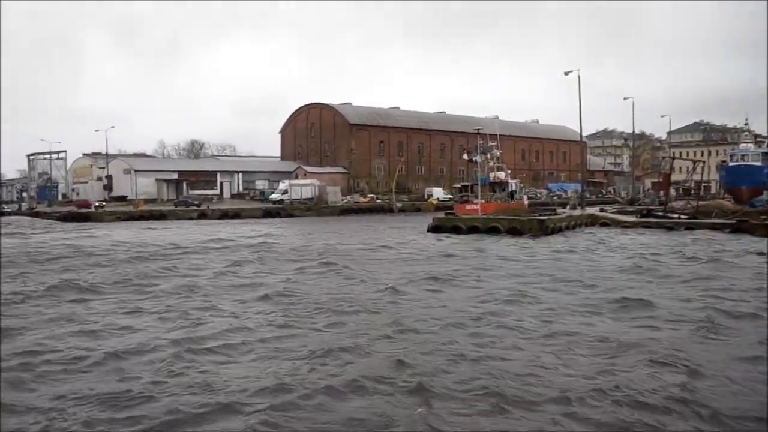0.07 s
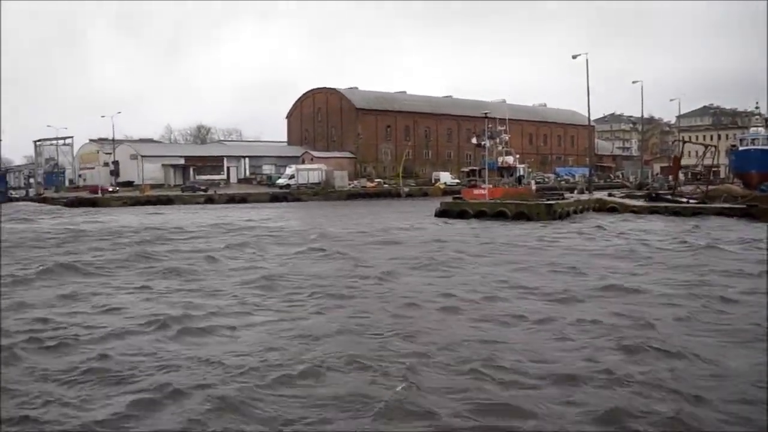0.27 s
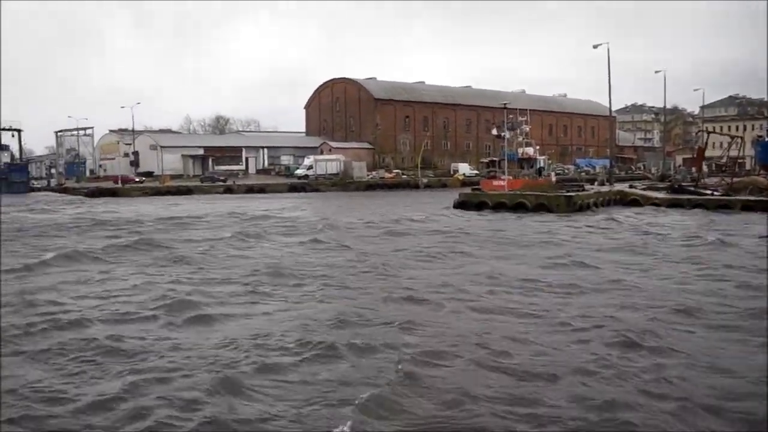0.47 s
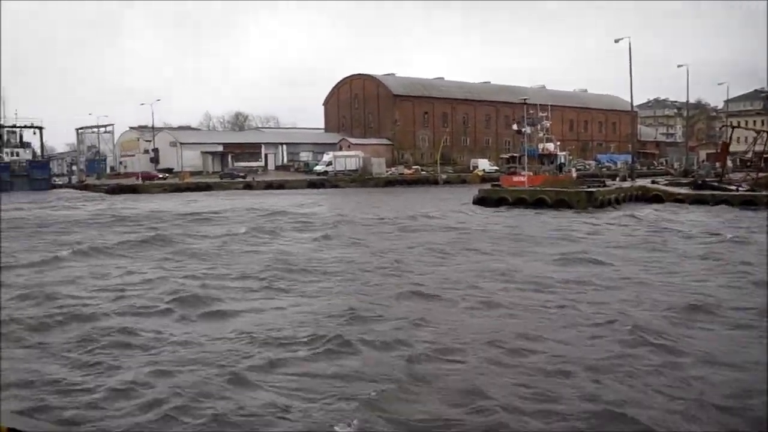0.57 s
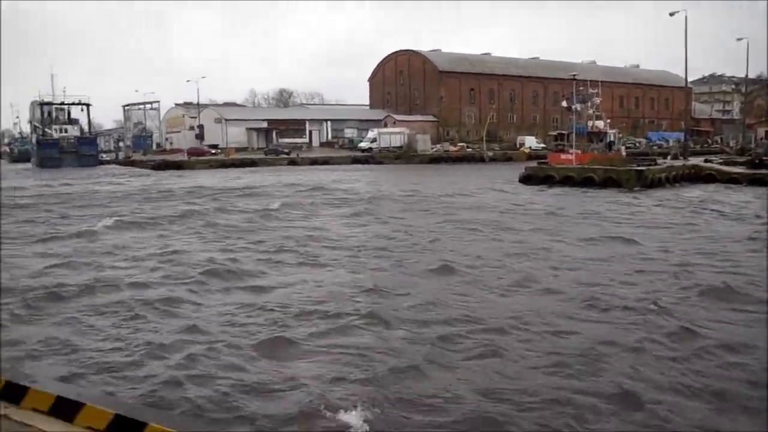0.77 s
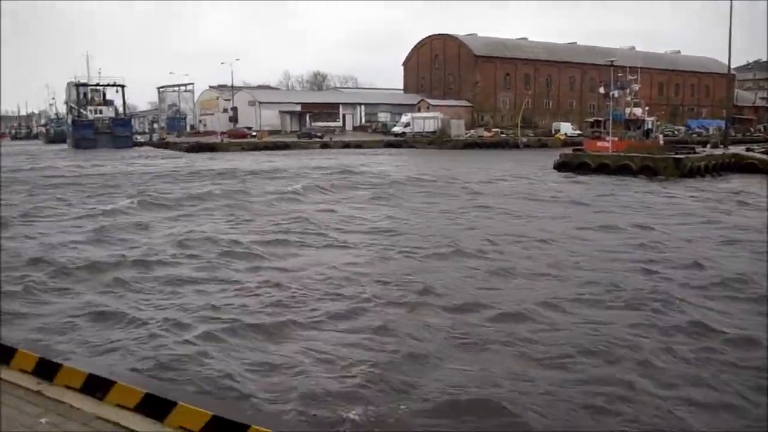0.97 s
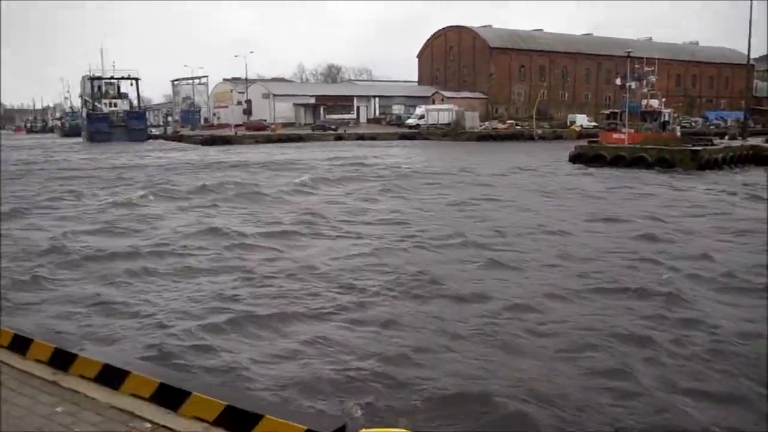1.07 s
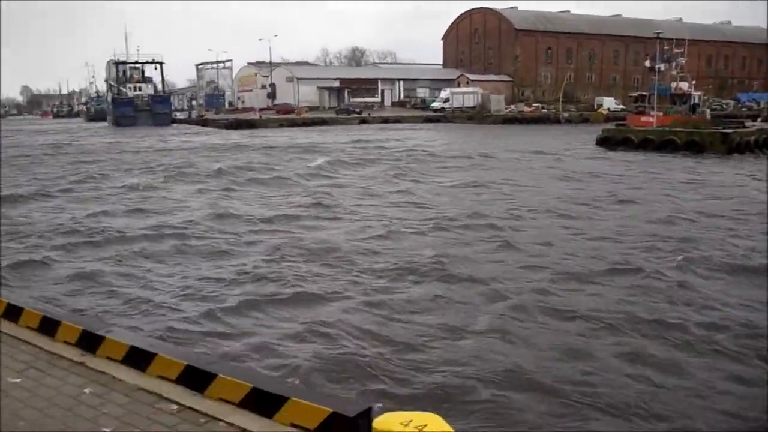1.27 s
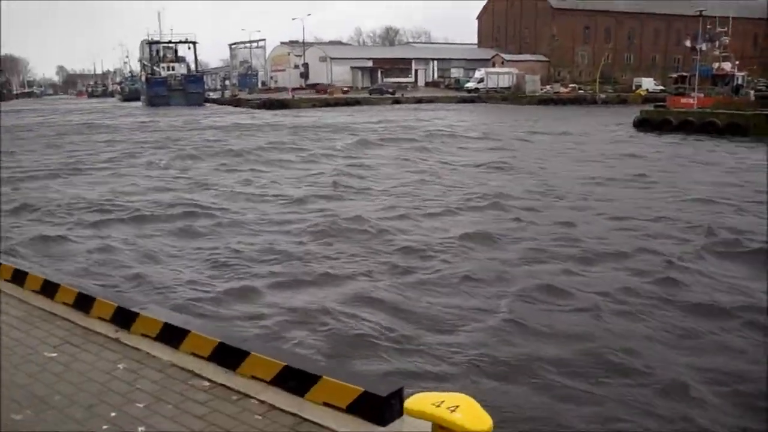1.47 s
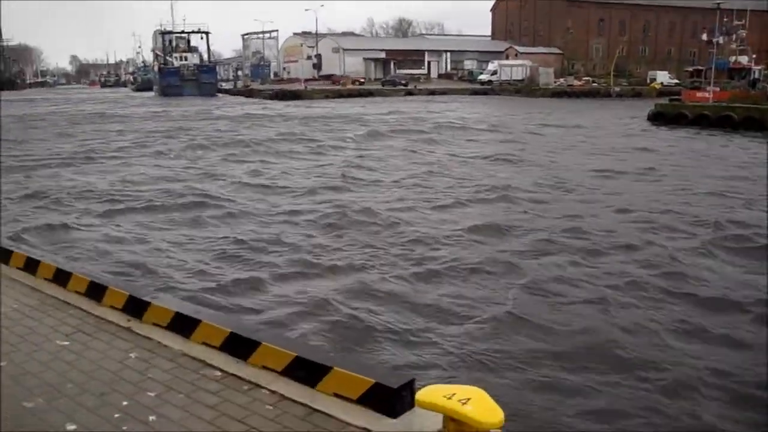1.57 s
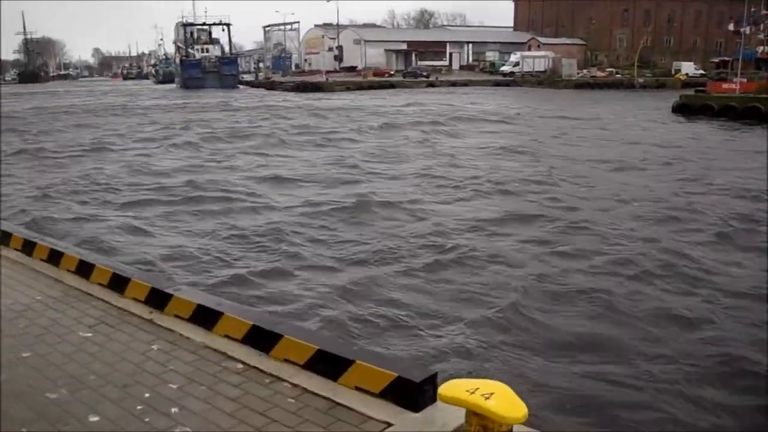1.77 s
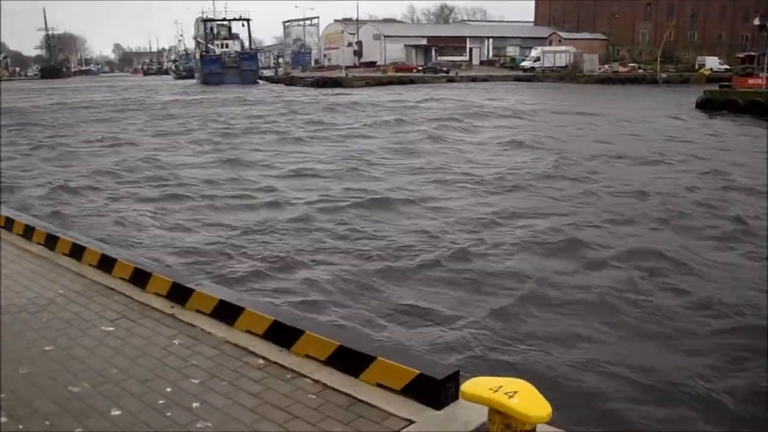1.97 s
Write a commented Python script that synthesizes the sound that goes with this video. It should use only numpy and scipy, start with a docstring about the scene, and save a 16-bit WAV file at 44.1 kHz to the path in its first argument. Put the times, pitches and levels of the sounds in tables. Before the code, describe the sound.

Strong wind gusts batter a bare microphone with low rumble, thuds and crackling, lumpy buffets.

```python
"""A harbour quay in a storm, the wind blowing straight onto a small bare microphone.
Faint behind: a far wash of wind and choppy water, and air hissing past the port, as coloured noise.
Close: large slow eddies rumble as low noise held at a level; thumps are swings that sag in pitch.
On the microphone itself: bright ticks, snaps of decaying pressure, and gusts torn into small eddies,
heard as lumpy, crackling noise under level curves. The port's own resonance lifts hiss and wash."""
import sys
import numpy as np
from scipy import signal
from scipy.fft import rfft, irfft, next_fast_len
from scipy.io import wavfile
from scipy.ndimage import uniform_filter1d

SR = 44100
rng = np.random.default_rng(int(sys.argv[2]) if len(sys.argv) > 2 else 0)


def output_pcm(signal):
    """Save a mono or channel-first signal as 16-bit PCM at the path in sys.argv[1].

    Samples are clipped to [-1, 1] before scaling.
    """
    pcm = np.clip(np.atleast_2d(signal).T, -1, 1) * 32767
    wavfile.write(sys.argv[1], SR, np.round(pcm).astype(np.int16))


N = 89346  # length in samples


def amp(db):
    """dB to gain."""
    return 10 ** (np.asarray(db) / 20)


def rms_one(x):
    """Scale to rms 1."""
    return x / np.sqrt(np.mean(x ** 2) + 1e-20)


def in_time(rows):
    """Columns of a table as curves, one value per sample."""
    times, *columns = np.transpose(rows)
    return [np.interp(np.arange(N) / SR, times, column) for column in columns]


def local_power(x, span_s):
    """Power of a sound, smoothed twice over a short span."""
    span = int(span_s * SR)
    return uniform_filter1d(uniform_filter1d(x ** 2, span), span)


def drift(rate_hz):
    """Slow chance: low-passed noise with spread about 1, its extremes rounded."""
    pole = np.exp(-2 * np.pi * rate_hz / SR)
    noise = rng.standard_normal(N + SR)
    slow = signal.lfilter([1], [1, -2 * pole, pole * pole], noise)[SR:]  # first second settles the filter
    return 2 * np.tanh(rms_one(slow) / 2)


LUMP_SPAN_S = 0.027  # lumps even out over this time


def flutter(rate_hz):
    """Chance whose slow part is taken out, so that it only flutters."""
    x = drift(rate_hz)
    return rms_one(x - uniform_filter1d(x, int(LUMP_SPAN_S * SR)))


def coloured(x, colour):
    """Filter by a colour table, keeping the power of white noise."""
    size = next_fast_len(N + SR // 4)
    table_hz, table_db = np.transpose(colour)
    hz = np.arange(size // 2 + 1) * SR / size
    gain = amp(np.interp(np.log(hz + 1), np.log(table_hz), table_db))
    return irfft(rfft(x, size) * rms_one(gain), size)[:N]


EVEN_S = 0.0076  # turbulence holds its level over this time


def turbulence(level, lumps_db, colour):
    """White pressure noise, evened as heard through its colour, swelling in lumps, then coloured."""
    white = rng.standard_normal(N)
    even = white / np.sqrt(local_power(coloured(white, colour), EVEN_S))
    return coloured(even * level * rms_one(amp(lumps_db)), colour)


# colour of the distant wind and water: f/Hz, relative level/dB
FAR_WASH_COLOUR = [(150, -11.5), (400, -52), (800, -48), (1700, -21), (3500, -35.5), (5500, -37.5),
                   (10000, -38.5), (12000, -38), (15500, -49)]
FAR_DB = -61.5


def far_wash():
    """Wind and choppy water far off blend into steady coloured noise."""
    return amp(FAR_DB) * coloured(rng.standard_normal(N), FAR_WASH_COLOUR)


# air passing close by the port: t/s, level/dB
HISS_LEVEL = [(0.0, -60.5), (0.19, -70), (0.77, -63), (0.82, -55), (0.86, -64), (0.88, -61.5), (1.43, -57),
              (1.45, -35), (1.49, -42), (1.5, -66), (1.53, -49), (1.56, -67), (1.58, -54), (1.63, -46),
              (1.65, -70), (1.66, -47), (1.68, -51), (1.75, -54.5), (1.8, -47.5), (1.87, -55), (1.89, -46),
              (1.93, -44.5), (1.94, -53), (2.0, -55)]
# colour of that air: f/Hz, relative level/dB
HISS_TONE = [(3000, 8), (6000, -3), (8500, -6), (10000, -1), (11500, -12), (14000, -7.5), (15500, -11)]
HISS_LUMP_DB, HISS_LUMP_HZ = 2.5, 90  # depth and rate of its swelling


def hiss():
    """Air hissing past the port: bright turbulence that swells and sinks."""
    level = amp(in_time(HISS_LEVEL)[0])
    return turbulence(level, HISS_LUMP_DB * drift(HISS_LUMP_HZ), HISS_TONE)


# large eddies at the microphone: t/s, level/dB
RUMBLE_LEVEL = [(0.0, -24), (0.03, -20.5), (0.05, -15.5), (0.17, -36), (0.22, -19), (0.3, -35), (0.35, -20),
                (0.44, -28.5), (0.47, -19.5), (0.56, -28), (0.68, -25.5), (0.7, -15.5), (0.72, -28),
                (0.83, -23.5), (0.88, -21), (0.9, -30), (0.93, -17.5), (0.96, -24), (1.01, -22.5),
                (1.05, -31.5), (1.08, -20.5), (1.2, -17.5), (1.22, -24.5), (1.34, -18.5), (1.47, -25),
                (1.57, -20.5), (1.73, -21.5), (1.77, -17.5), (1.79, -24), (1.92, -19), (1.94, -21),
                (2.0, -15.5)]
# colour of the large eddies: f/Hz, relative level/dB
RUMBLE_TONE = [(12, -37), (22, -10), (40, 0), (60, -4), (110, -3), (170, -14.5), (300, -24.5), (600, -84.5)]
RUMBLE_SPAN_S = 0.024  # the rumble holds its level over this time


def rumble():
    """Large eddies rolling over the microphone: low noise, evened, under a smoothed level curve."""
    roll = coloured(rng.standard_normal(N), RUMBLE_TONE)
    even = roll / np.sqrt(local_power(roll, RUMBLE_SPAN_S))
    level = amp(in_time(RUMBLE_LEVEL)[0])
    return even * uniform_filter1d(level, int(RUMBLE_SPAN_S * SR) // 2)


# heavy thumps in the port: centre t/s, pitch at the centre f/Hz, peak level/dB
THUMP_EVENTS = [(0.039, 216, -13), (0.84, 290, -11), (1.473, 255, -5), (1.539, 184, -8.5), (1.84, 140, -11)]
THUMP_CYCLES, THUMP_SAG_PER_CYCLE = 1.05, 0.075  # spread of the bell in cycles, share of pitch lost


def thumps():
    """A big eddy rocks the air in the port for a few swings that slow down."""
    centre_s, hz, db = np.transpose(THUMP_EVENTS)[:, :, None]
    turns = (np.arange(N) / SR - centre_s) * hz
    sagging = turns - THUMP_SAG_PER_CYCLE * turns ** 2 / 2
    swing = np.sin(2 * np.pi * (sagging + rng.random(centre_s.shape)))
    bell = np.exp(-(turns / THUMP_CYCLES) ** 2 / 2)
    return np.sum(amp(db) * bell * swing, axis=0)


# sharp ticks in the strongest gusts: t/s, level before colouring/dB
TICK_EVENTS = [(0.8225, -42), (0.864, -33), (1.4482, -22), (1.471, -18.5), (1.485, -14), (1.5734, -27.5),
               (1.593, -23), (1.604, -41), (1.6237, -27), (1.658, -34), (1.776, -28)]
# colour of the ticks: f/Hz, relative level/dB
TICK_TONE = [(1000, -27), (2500, 16.5), (5000, 4.5), (8000, -7.5), (10000, -0.5), (12000, -22),
             (15500, -16)]
TICK_S = 0.00028  # decay time


def ticks():
    """Very short bright bursts: noise that dies away at once."""
    out = np.zeros(N + 200)
    decay = np.exp(-np.arange(200) / SR / TICK_S)
    for (start_s, db), noise in zip(TICK_EVENTS, rng.standard_normal((len(TICK_EVENTS), 200))):
        i = int(start_s * SR)
        out[i:i + 200] += amp(db) * noise * decay
    return coloured(out[:N], TICK_TONE)


# the sharpest eddies snap the diaphragm: t/s, peak level without raggedness/dB
SNAP_EVENTS = [(0.0343, -18), (0.04, -17.5), (0.1142, -19.5), (0.1442, -10), (0.1683, -3), (0.183, -13),
               (0.2047, -13), (0.218, -13.5), (0.24, -17.5), (0.3887, -20.5), (0.4763, -24.5),
               (0.695, -25.5), (0.838, -12), (0.851, -9), (0.9337, -29), (0.9405, -27), (1.141, -28),
               (1.1586, -15.5), (1.1865, -25), (1.1952, -19.5), (1.3495, -9.5), (1.3743, -30),
               (1.42, -15.5), (1.4446, -13.5), (1.4858, -1), (1.501, -7), (1.5214, -10), (1.5671, -12),
               (1.6116, -12), (1.693, -7), (1.7785, -8), (1.8498, -8), (1.9077, -7)]
# colour of the snaps: f/Hz, relative level/dB
SNAP_TONE = [(200, -8.5), (600, 4), (1500, -4), (3000, -15), (6000, -32), (12000, -72)]
SNAP_S, SNAP_RAGGED = 0.00031, 0.86  # decay time of the kink, strength of chance in it


def snaps():
    """Each snap is a sudden push or pull of pressure with a ragged edge."""
    out = np.zeros(N + 200)
    kink = np.exp(-np.arange(200) / SR / SNAP_S)
    for (start_s, db), noise in zip(SNAP_EVENTS, rng.standard_normal((len(SNAP_EVENTS), 201))):
        i = int(start_s * SR)
        push_or_pull = np.sign(noise[0])
        out[i:i + 200] += amp(db) * push_or_pull * kink * (1 + SNAP_RAGGED * noise[1:])
    # one smooth kink sets the scale of the peaks
    smooth = np.zeros(N)
    smooth[N // 2:N // 2 + 200] = kink
    return coloured(out[:N], SNAP_TONE) / np.max(coloured(smooth, SNAP_TONE))


# slow rise and fall of the gusts at the port, beneath the single buffets:
# t/s, body level/dB, sharp edge level/dB
GUST_LEVELS = [(0, -44, -92), (.1, -42.5, -70), (.15, -21, -53), (.23, -46, -59), (.27, -44.5, -78),
               (.33, -54, -61), (.5, -45, -64), (.66, -47, -64.5), (.77, -45.5, -72), (.8, -39, -46),
               (.88, -20, -48), (.92, -34.5, -72), (1.06, -46.5, -64), (1.2, -40, -66), (1.32, -35, -60),
               (1.43, -25, -72), (1.5, -15.5, -41), (1.62, -22, -25.5), (1.72, -20.5, -75),
               (1.82, -19.5, -69), (1.93, -30, -51), (1.97, -32, -69), (2.02, -24, -81)]
# single buffets: centre t/s, length t/s, body level/dB, sharp edge relative to the body level/dB
BUFFET_EVENTS = [(0.037, 0.012, -21.5, -16.5), (0.07, 0.0043, -34, -10.5), (0.135, 0.021, -22, -14),
                 (0.168, 0.023, -18, -14), (0.184, 0.027, -24.5, -12), (0.202, 0.028, -19, -17),
                 (0.227, 0.014, -24, -14.5), (0.24, 0.018, -24.5, -31), (0.376, 0.022, -29, -17),
                 (0.419, 0.0038, -29, -13), (0.477, 0.0066, -28.5, -47), (0.529, 0.0067, -25.5, -27),
                 (0.798, 0.017, -14.5, -23.5), (0.812, 0.024, -16, -9.5), (0.837, 0.038, -15.5, -14.5),
                 (0.862, 0.019, -13.5, -10), (0.894, 0.015, -20.5, -13), (0.938, 0.0078, -20.5, -12),
                 (1.124, 0.017, -32.5, -23.5), (1.16, 0.0077, -18, -27), (1.194, 0.025, -34, -12),
                 (1.26, 0.0047, -21.5, -48), (1.343, 0.012, -13, -19), (1.372, 0.0069, -14.5, -14.5),
                 (1.408, 0.014, -19.5, -10), (1.445, 0.0088, -7.5, -14.5), (1.478, 0.042, -11.5, -15.5),
                 (1.516, 0.017, -17.5, -5.5), (1.54, 0.019, -16, -34), (1.57, 0.025, -19, -4),
                 (1.58, 0.015, -13, -7), (1.607, 0.085, -17, -25), (1.624, 0.014, -22, -9),
                 (1.663, 0.019, -13.5, -7), (1.7, 0.023, -20.5, -9.5), (1.736, 0.01, -13.5, -11),
                 (1.763, 0.011, -22.5, -28.5), (1.774, 0.0069, -5.5, -15), (1.794, 0.0018, -7, -26),
                 (1.808, 0.0073, -23, -9.5), (1.85, 0.023, -20.5, -11.5), (1.869, 0.0088, -15, -30),
                 (1.891, 0.0039, -11, -26), (1.908, 0.02, -10.5, -18), (1.925, 0.048, -20.5, -44),
                 (2.013, 0.008, -15, -18)]
# colour of the thudding body: f/Hz, relative level/dB
BODY_TONE = [(40, -59), (100, -8.5), (180, -4), (280, -3), (500, -8.5), (800, -15), (1300, -26.5),
             (2500, -58), (5000, -81)]
# colour of the sharp edges: f/Hz, relative level/dB
EDGE_TONE = [(500, 0), (1000, 2.5), (1500, -0.5), (2500, -8.5), (4000, -25), (6000, -59), (9000, -59),
             (15000, -73)]
# colour of the crackle: f/Hz, relative level/dB
CRACKLE_TONE = [(2000, 6), (4000, 6), (6000, -6.5), (8500, -14.5), (10000, -26.5), (12000, -31),
                (15500, -23)]
LUMP_DB, LUMP_HZ = 4, 146  # eddies come in lumps: depth in the body, and rate
EDGE_LUMP_DB, EDGE_OWN_DB, EDGE_OWN_HZ = 3.5, 5.5, 250  # edges: shared depth, own depth and rate
CRACKLE_DB, CRACKLE_GROWTH = -46.5, 1.48  # level at an edge of -27.5 dB; grows faster than the edge
CRACKLE_LUMP_DB, CRACKLE_LUMP_HZ = 7.5, 247  # crackle's own lumps: depth and rate


def buffeting():
    """Small eddies of the gusts: thudding body, sharp edges and crackle share lumps; buffets are bells."""
    body_db, edge_db = in_time(GUST_LEVELS)
    centre_s, length_s, db, sharp_db = np.transpose(BUFFET_EVENTS)[:, :, None]
    bells = np.exp(-4 * ((np.arange(N) / SR - centre_s) / length_s) ** 2)  # in power
    body = np.sqrt(amp(body_db) ** 2 + np.sum(amp(db) ** 2 * bells, axis=0))
    edge = np.sqrt(amp(edge_db) ** 2 + np.sum(amp(db + sharp_db) ** 2 * bells, axis=0))
    crackle = amp(CRACKLE_DB) * (edge / amp(-27.5)) ** CRACKLE_GROWTH

    lumps = flutter(LUMP_HZ)
    edge_lumps = EDGE_LUMP_DB * lumps + EDGE_OWN_DB * flutter(EDGE_OWN_HZ)
    crackle_lumps = EDGE_LUMP_DB * lumps + CRACKLE_LUMP_DB * flutter(CRACKLE_LUMP_HZ)
    return (turbulence(body, LUMP_DB * lumps, BODY_TONE)
            + turbulence(edge, edge_lumps, EDGE_TONE)
            + turbulence(crackle, crackle_lumps, CRACKLE_TONE))


def scene():
    """All of it reaches one microphone, from the far wash to the gusts at the port."""
    return (far_wash() + hiss() + rumble() + thumps() + ticks() + snaps() + buffeting())[None]


OVERLOAD = .97  # ceiling that rounded peaks approach, full scale 1
CUTOFF_HZ = 15700  # from here up the treble is 50 dB down


def record(dry):
    """The microphone's signal: a 4 ms fade-in, peaks rounded by overload, the top cut."""
    dry = dry * np.minimum(np.arange(N) / (.004 * SR), 1)
    rounded = dry / (1 + (dry / OVERLOAD) ** 4) ** .25
    top_cut = signal.cheby2(18, 50, CUTOFF_HZ, fs=SR, output="sos")
    return signal.sosfilt(top_cut, rounded)


dry = scene()
out = record(dry)
output_pcm(out)
```